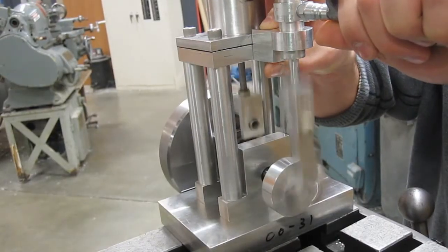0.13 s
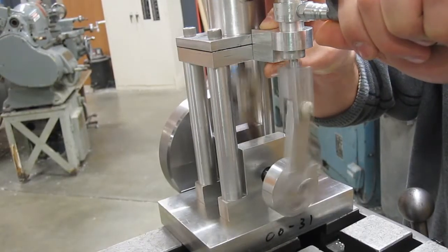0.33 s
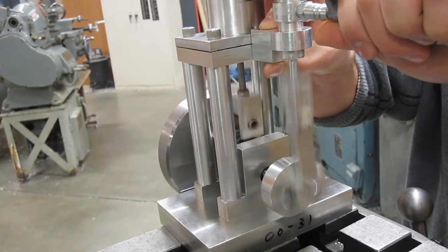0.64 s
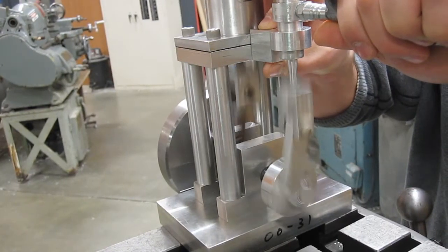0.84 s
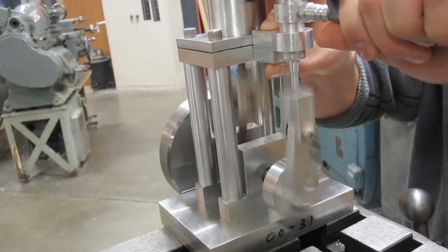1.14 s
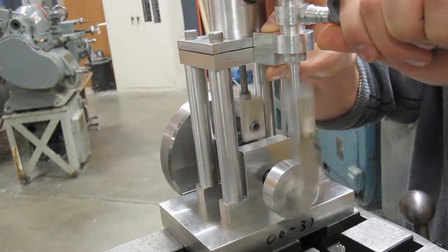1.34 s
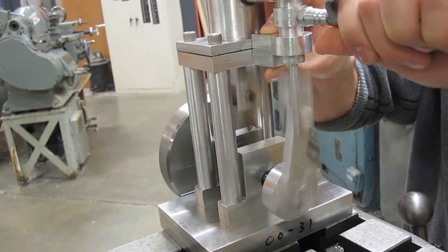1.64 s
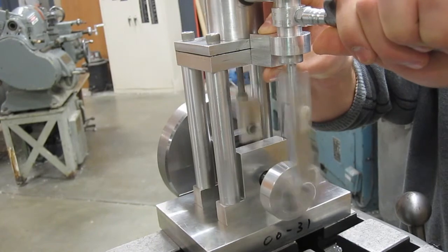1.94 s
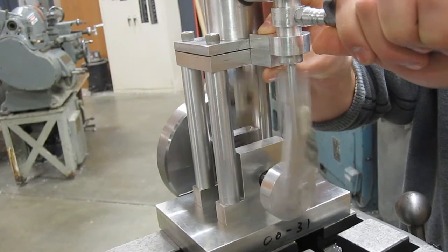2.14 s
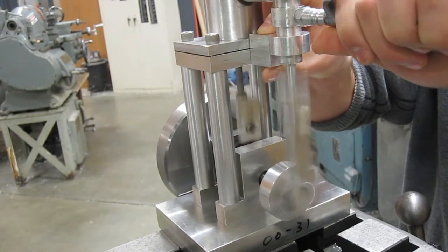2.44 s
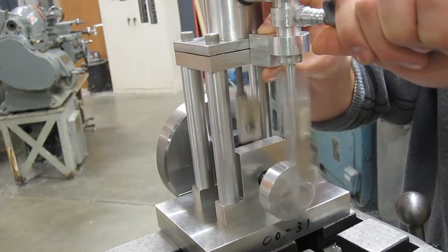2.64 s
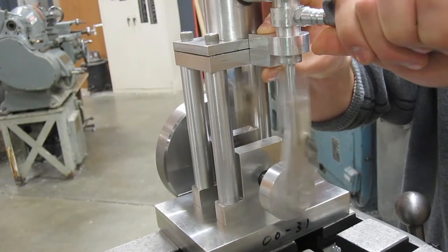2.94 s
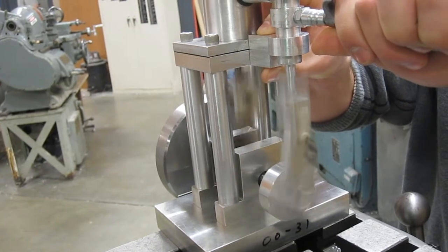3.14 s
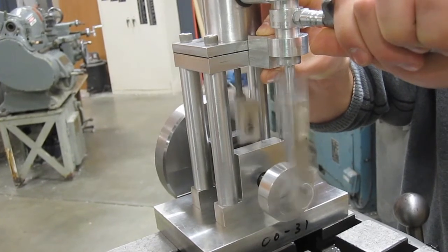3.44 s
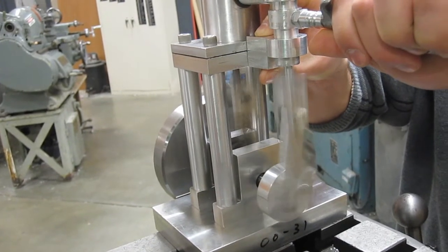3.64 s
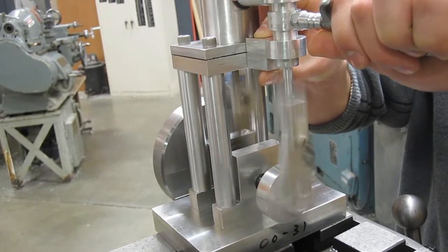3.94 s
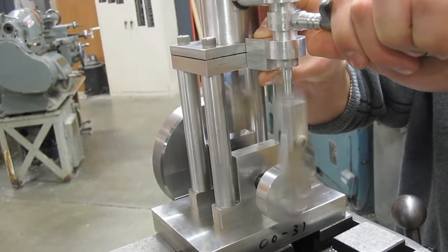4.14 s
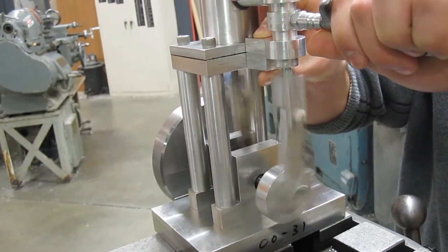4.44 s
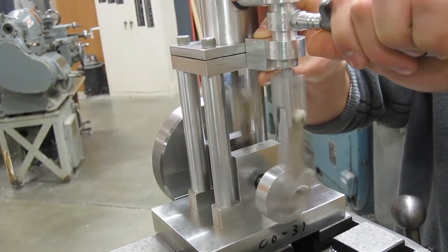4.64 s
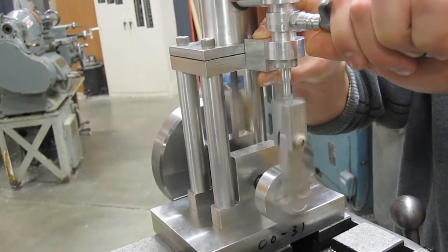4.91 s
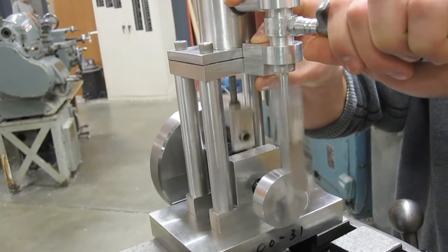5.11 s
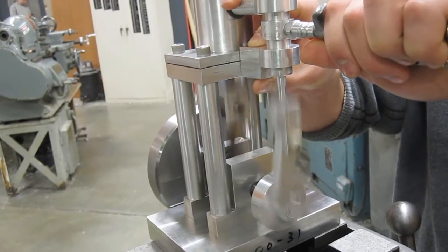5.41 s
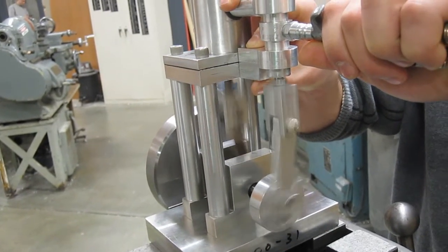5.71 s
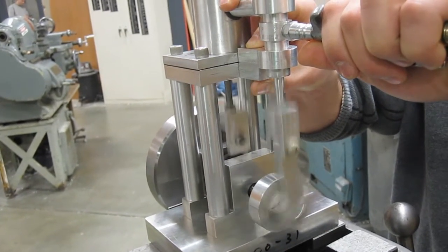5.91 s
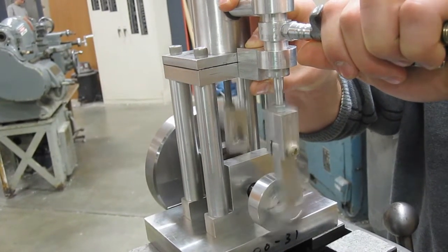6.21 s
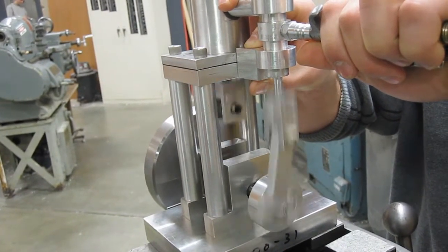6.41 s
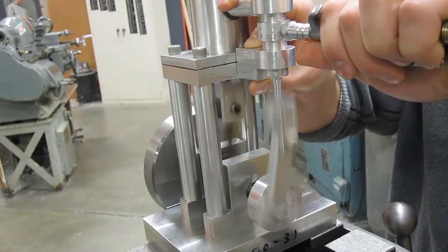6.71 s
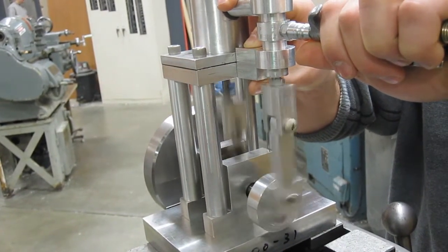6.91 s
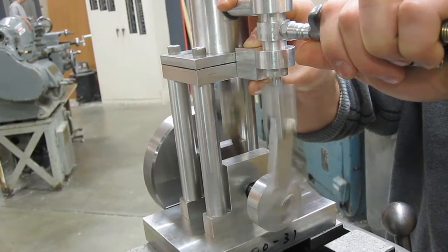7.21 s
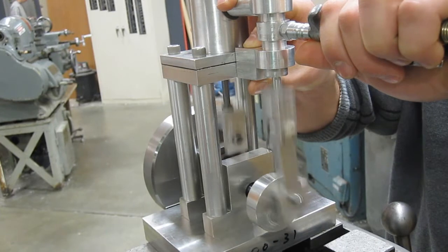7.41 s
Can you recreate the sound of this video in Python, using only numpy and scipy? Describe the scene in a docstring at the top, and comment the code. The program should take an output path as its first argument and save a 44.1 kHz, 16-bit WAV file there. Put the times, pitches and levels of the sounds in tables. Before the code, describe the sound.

Close by, quick puffs of air and light metal clatter come from a little piston engine fed by a hissing hose. It soon speeds up to a rapid flutter as the leak quietens, and air spits now and then. The leak grows again and the engine winds down to a slower, even chuffing with occasional dry knocks. A faint workshop ventilation hum lies underneath.

```python
"""A small model engine runs on compressed air from a hand-held hose, close by in a humming machine shop.
From the start air leaks at the hose tip, and each turn brings a valve puff, a knock at either end of the
stroke and an exhaust chuff that rings the cylinder. From about 1.5 s the hose is pressed home: the leak
softens, air spits now and then, and the engine speeds up. After 3.3 s the hand eases, the leak grows
again and the engine slowly runs down, with a few harder knocks."""
import sys
import numpy as np
from scipy import signal
from scipy.fft import rfft, irfft, next_fast_len
from scipy.io import wavfile
from scipy.ndimage import map_coordinates

SR = 44100
rng = np.random.default_rng(int(sys.argv[2]) if len(sys.argv) > 2 else 0)


def output_pcm(signal):
    """Save a mono or channel-first signal as 16-bit PCM at the path in sys.argv[1].

    Samples are clipped to [-1, 1] before scaling.
    """
    pcm = np.clip(np.atleast_2d(signal).T, -1, 1) * 32767
    wavfile.write(sys.argv[1], SR, np.round(pcm).astype(np.int16))


N = 333204

# the notes of the struck engine frame: (pitch [Hz], relative level [dB], time to fade by 60 dB [s])
FRAME_NOTES = [(799.4, 12, 0.04), (1010, 13, 0.011), (1484, 10.5, 0.017)]
# the tone colour of rattling metal: (frequency [Hz], relative level [dB])
RATTLE_COLOUR = [(600, -41), (950, -2), (1200, -4.5), (1500, 0.5), (1780, 0.5), (2300, 2.5), (2900, 7),
                 (4000, -32), (8000, -33)]


def amp(db):
    """Turn decibels into a number to multiply by."""
    return 10 ** (np.asarray(db) / 20)


def unit(x):
    """Scale a sound to an average strength (rms) of 1."""
    return x / np.sqrt(np.mean(x ** 2) + 1e-20)


def curves(rows):
    """Join timed points with straight lines: one curve for each column after the time."""
    times, *columns = np.transpose(rows)
    return [np.interp(np.arange(N) / SR, times, column) for column in columns]


def wobble(rate):
    """A smooth curve through random points, rate of them a second."""
    points = rng.standard_normal(int(N * rate / SR) + 4)
    return map_coordinates(points, [np.arange(N) * rate / SR])


def filtered(x, response):
    """Multiply each frequency in a sound by response(hz)."""
    size = next_fast_len(N + 8192)
    return irfft(rfft(x, size) * response(np.fft.rfftfreq(size, 1 / SR)), size)[:N]


def rush(colour):
    """Rushing noise shaped by (frequency [Hz], level [dB]) points."""
    points_hz, db = np.transpose(colour)
    noise = rng.standard_normal(N)
    return unit(filtered(noise, lambda hz: amp(np.interp(np.log(hz + 1), np.log(points_hz), db))))


def breathy_tone(centre_hz, width_hz):
    """Swirling air rings a hollow space around one pitch, which may move."""
    angle = 2 * np.pi * np.cumsum(centre_hz * np.ones(N)) / SR
    a, b = (filtered(rng.standard_normal(N), lambda hz: 1 / (1 + (hz / width_hz) ** 2)) for _ in range(2))
    return unit(a * np.cos(angle) + b * np.sin(angle))


def swell(turn, angle, width):
    """A smooth rise and fall once a turn; angle and width are in turns of the crank."""
    distance = (turn - angle + .5) % 1 - .5
    return np.exp(-.5 * (distance / width) ** 2)


def each_turn(turn, spread_db):
    """A new random strength for each turn, changing in mid stroke."""
    index = (turn + 1.5).astype(int)
    return amp(spread_db * rng.standard_normal(index.max() + 1))[index]


def strikes(turn, angle, scatter_s, spread_db):
    """One slightly uneven tap each time the crank passes an angle."""
    passes = np.flatnonzero(np.diff(np.floor(turn - angle)))
    late, size = rng.standard_normal((len(passes), 2)).T
    at = np.clip(passes + late * scatter_s * SR, 0, N - 1).astype(int)
    return np.bincount(at, amp(spread_db * size), N)


def ringing(blows, notes):
    """Each blow sets off an object's fading notes; neighbouring notes swing opposite ways."""
    t = np.arange(SR // 8) / SR
    ring = sum((-1) ** k * amp(db - 60 * t / fade_s) * np.sin(2 * np.pi * hz * t)
               for k, (hz, db, fade_s) in enumerate(notes))
    return signal.fftconvolve(blows, ring / np.abs(ring).max())[:N]


def leak(whistle_db):
    """Air hisses out round the hose tip and whistles in the gap; the whistle fades as the gap closes."""
    # the tone colour of the hiss: (frequency [Hz], relative level [dB])
    hiss_colour = [(200, -45), (600, -22.5), (1200, -18.5), (1450, -14), (1780, -15), (2600, -7.5),
                   (3500, -1.5), (5600, -5), (6600, -1.5), (8800, -5), (10600, -1), (12700, -1),
                   (13600, -6), (15500, -11.5)]
    # the tones of the gap: (pitch [Hz], width [Hz], base level [dB])
    gap_tones = [(1510, 150, -48), (2100, 180, -45), (4930, 220, -45), (7240, 340, -32.3), (8300, 220, -41),
                 (9150, 160, -35.5), (10800, 550, -34), (12250, 330, -33.5)]
    hiss = amp(-23 + .046 * whistle_db + .64 * wobble(14)) * rush(hiss_colour)
    whistle = sum(amp(db + .45 * wobble(18)) * breathy_tone(hz, width) for hz, width, db in gap_tones)
    return hiss + amp(whistle_db) * whistle


def shop():
    """Ventilation murmurs in the shop over a deep, slightly wavering hum."""
    # the strength of the hum: (time [s], level [dB])
    hum_levels = [(0, -68), (1.2, -71), (3.3, -88), (3.8, -69), (7.56, -66)]
    # the tone colour of the ventilation: (frequency [Hz], relative level [dB])
    murmur_colour = [(20, -17), (60, -7), (150, -2.5), (300, -1), (500, 0.5), (900, 1.5), (3000, -37)]
    hum_db, = curves(hum_levels)
    hum_hz = 35.2 + .7 * wobble(4)
    hum = np.sin(2 * np.pi * np.cumsum(hum_hz) / SR)
    return amp(-59) * rush(murmur_colour) + amp(hum_db) * unit(hum)


def valve(turn, pressure_db):
    """The valve snaps open with a bright puff that rings the chamber around it."""
    # the tone colour of the puff: (frequency [Hz], relative level [dB])
    puff_colour = [(700, -14), (2000, -9), (4400, 7), (6000, 10), (8000, 6), (12000, -36), (15500, -40)]
    # the chamber's tones: (pitch [Hz], width [Hz], base level [dB], growth [dB per dB of pressure])
    chamber_tones = [(3800, 300, -36.5, 1.5), (4380, 790, -31, 1.65), (6110, 2600, -27, -1.5),
                     (11400, 400, -36.5, -12)]
    jet = amp(-25 + .15 * pressure_db) * rush(puff_colour)
    chamber = sum(amp(db + growth * pressure_db) * breathy_tone(hz, width)
                  for hz, width, db, growth in chamber_tones)
    opening = swell(turn, angle=.244, width=.021 * amp(1.06 * pressure_db))  # more pressure, longer puff
    return opening * each_turn(turn, spread_db=.5) * (jet + chamber)


def crank(turn, speed, haste, pressure_db):
    """Loose bearings knock the frame twice a turn and rattle briefly; the slide rubs in between."""
    ahead = turn + .003 * speed  # the knocks come 3 ms early
    first = strikes(ahead, angle=.295, scatter_s=.0008, spread_db=1.2)
    second = strikes(ahead, angle=.785, scatter_s=.0008, spread_db=1)
    rub = .27 + .14 * haste + .6 * swell(ahead, .13, width=.06) + .5 * swell(ahead, .82, width=.05)
    force = .65 * first + second + .031 * rub * rng.standard_normal(N)
    # every turn shares the blow out among the frame's notes a little differently
    ring = sum((-1) ** k * amp(note[1]) * ringing(force * each_turn(ahead, spread_db=1.2), [note])
               for k, note in enumerate(FRAME_NOTES))
    knock_db = -44.5 - 1.13 * pressure_db  # more air softens the knocks
    loose = swell(ahead, angle=.8, width=.038) + .9 * swell(ahead, angle=.3, width=.03)
    rattle_db = -30.8 - 3.5 * haste + 2.5 * wobble(400)  # the joints rattle most when running slowly
    return amp(knock_db) * unit(ring) + amp(rattle_db) * loose * rush(RATTLE_COLOUR)


def bench(turn, speed, pressure_db):
    """The piston thumps the bench as it turns back: a shove and rebound at one end, softly at the other."""
    # the notes of the bench: (pitch [Hz], relative level [dB], time to fade by 60 dB [s])
    bench_notes = [(86, -5, 0.045), (145, -1.5, 0.026), (217, -3, 0.031), (320, -11.5, 0.039)]
    ahead = turn + .012 * speed  # the push builds 12 ms before the piston turns back
    shove = strikes(ahead, angle=.288, scatter_s=.0003, spread_db=1)
    rebound = strikes(ahead, angle=.37, scatter_s=.0005, spread_db=2)
    far_end = strikes(ahead, angle=.785, scatter_s=.0005, spread_db=2)
    thump_db = -51 - .41 * pressure_db  # more air cushions the piston
    return amp(thump_db) * ringing(shove + amp(-8) * rebound + amp(-9.5) * far_end, bench_notes)


def exhaust(turn, haste, pressure_db):
    """Air chuffs through the cylinder and rings it, higher as the piston shortens the space inside."""
    # the tone colour of the rushing air: (frequency [Hz], relative level [dB])
    jet_colour = [(400, -40), (1750, -19), (2250, 1), (2850, -8), (4300, 5), (5600, 5.5), (6100, 8),
                  (7500, 4), (8800, 2), (11300, 8.5), (13000, 1.5), (15500, -24)]
    # the cylinder's tones: (lowest pitch [Hz], width [Hz], base level [dB], growth [dB per dB of pressure])
    cylinder_tones = [(3580, 400, -27, 0), (10350, 550, -40, 1.9)]
    chuff_db = 3.5 * haste - .8 * pressure_db
    release = swell(turn, angle=.747, width=.075)  # the exhaust hole opens
    sweep = swell(turn, angle=.0066, width=.11)  # the piston pushes the air out
    inlet = swell(turn, angle=.28, width=.035)  # fresh air enters
    # the jet's treble grows much faster with pressure than its body
    body = amp(-23.5 + .12 * pressure_db) * rush(jet_colour)
    treble = amp(-36 + 2 * pressure_db) * breathy_tone(centre_hz=11500, width_hz=1250)
    seep = amp(-16 + 1.04 * pressure_db)  # air always slips past the piston
    passing = seep + amp(-1.5) * release + amp(-5.5 + 1.6 * chuff_db) * sweep + amp(-6.5) * inlet
    flow = passing * amp(1.5 * wobble(500)) * (body + treble)
    length = 1 - .17 * (1 - np.cos(2 * np.pi * (turn - .96)))  # 1 is the full space
    ring = sum(amp(db + growth * pressure_db) * breathy_tone(hz / length, width)
               for hz, width, db, growth in cylinder_tones)
    drive = amp(chuff_db) * (sweep + amp(-10) * release + amp(-15.5) * inlet)
    return (flow + drive * ring) * each_turn(turn, spread_db=.5)


def echo(sound, fade_s):
    """The shop answers a sound with a tail that fades by 60 dB in fade_s seconds."""
    t = np.arange(SR // 2) / SR
    tail = rng.standard_normal(len(t)) * amp(-60 * t / fade_s)
    return signal.fftconvolve(sound, tail / np.linalg.norm(tail))[:N]


def spits():
    """Now and then air spits sharply at the valve and hose for a few milliseconds."""
    # the spits of air: (time [s], starting level [dB], rough pitch [Hz])
    air_spits = [(1.4284, -22, 7300), (1.5556, -25, 7330), (1.6733, -22, 7240), (3.4436, -14, 9700),
                 (3.746, -12, 10500), (4.0492, -19, 7300), (4.2722, -29, 3550)]
    out, t = np.zeros(N + SR), np.arange(SR // 20) / SR
    for start_s, db, hz in air_spits:
        band = signal.butter(2, [.65 * hz, 1.25 * hz], "band", fs=SR)
        burst = unit(signal.lfilter(*band, rng.standard_normal(len(t))))
        out[round(start_s * SR):][:len(t)] += amp(db - 60 * t / .04) * burst
    return out[:N]


def hard_knocks():
    """Some strokes land harder, with a dry crack on top of the frame's ring."""
    # the hardest knocks of the bearings: (time [s], relative level [dB])
    knocks = [(3.794, -20), (4.519, -23), (5.776, -23), (6.06, -45), (6.502, -29), (6.809, -25),
              (7.121, -23.5)]
    times, db = np.transpose(knocks)
    blows = np.bincount(np.round(times * SR).astype(int), amp(db), N)
    t = np.arange(SR // 10) / SR
    crack = signal.fftconvolve(blows, amp(-60 * t / .042))[:N] * rush(RATTLE_COLOUR)
    return amp(-7) * (ringing(blows, FRAME_NOTES) + crack)


def thin_bass(x, below_hz):
    """Thin out the deep sound below below_hz."""
    return filtered(x, lambda hz: hz ** 2 / np.hypot(hz ** 2, below_hz ** 2))


def scene():
    """Speed and air pressure drive the engine, heard with its faint echo, the leak and the shop."""
    # how fast the crank spins: (time [s], speed [turns a second])
    crank_speeds = [(0.0, 8.81), (0.6, 7.602), (1.1, 7.033), (1.4, 7.503), (1.7, 8.882), (2.0, 12.353),
                    (2.3, 14.288), (2.7, 15.721), (3.1, 17.398), (3.4, 17.212), (3.7, 15.087),
                    (4.1, 12.686), (4.5, 10.698), (5.0, 8.955), (5.5, 7.772), (6.0, 7.005), (6.7, 6.475),
                    (7.56, 6.194)]
    # the air let in by the hand on the hose: (time [s], valve pressure [dB], leak whistle [dB])
    air_supply = [(0, -0.5, 1.5), (1.2, 2.2, 1.5), (1.65, 4.5, 1.5), (1.95, 4.5, -6), (3.3, 4.5, -7.5),
                  (3.65, 0.5, 0.5), (4.5, -0.5, .5), (5.8, -0.5, 1.9), (7.56, -0.2, 2.3)]
    speed, = curves(crank_speeds)
    pressure_db, whistle_db = curves(air_supply)
    turn = -.741 + np.cumsum(speed) / SR  # the crank's position, in turns
    haste = np.log2(speed / speed.min())  # 0 at the slowest, 1 more each time the speed doubles
    air = valve(turn, pressure_db) + exhaust(turn, haste, pressure_db) + spits()
    metal = crank(turn, speed, haste, pressure_db) + hard_knocks()
    engine = thin_bass(air + metal, below_hz=486) + bench(turn, speed, pressure_db)
    mix = leak(whistle_db) + shop() + engine + amp(-15) * echo(engine, fade_s=.4)
    return np.tile(mix, (2, 1))  # the same sound left and right


def record(dry):
    """Both channels lose the very highest treble."""
    return np.array([filtered(channel, lambda hz: hz < 15800) for channel in dry])


dry = scene()
out = record(dry)
output_pcm(out)
```